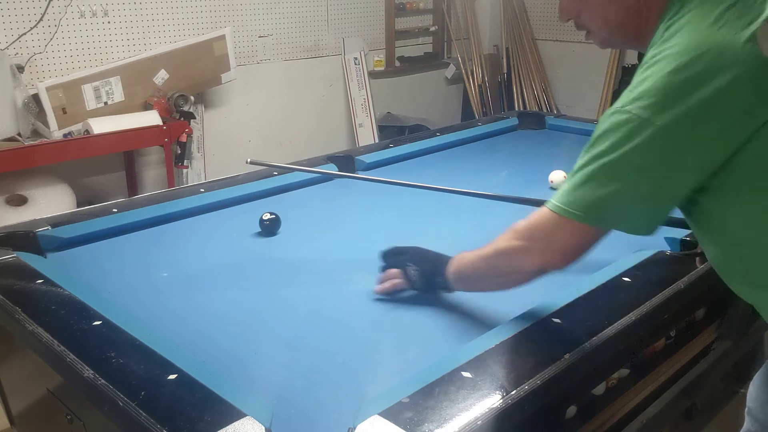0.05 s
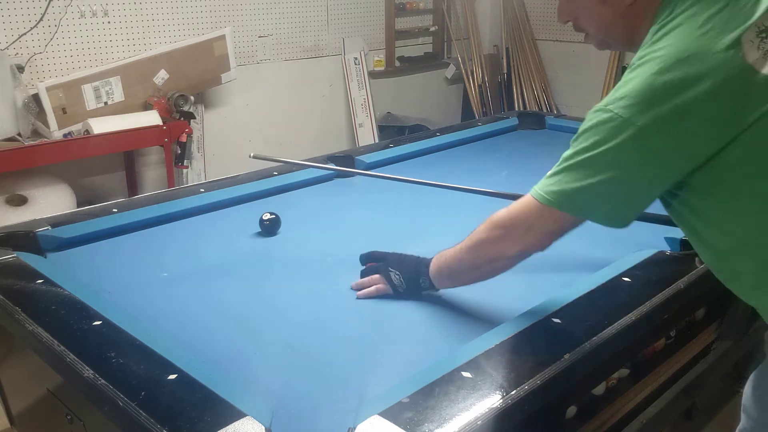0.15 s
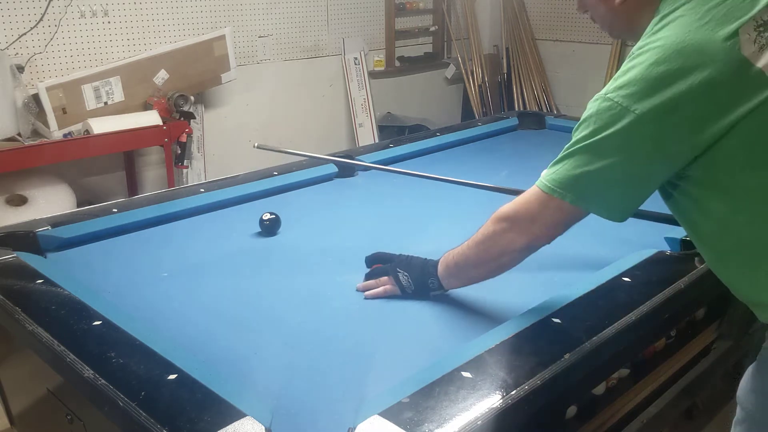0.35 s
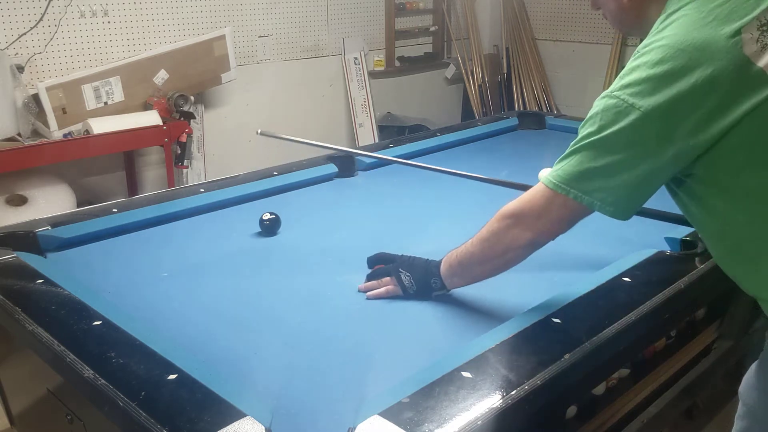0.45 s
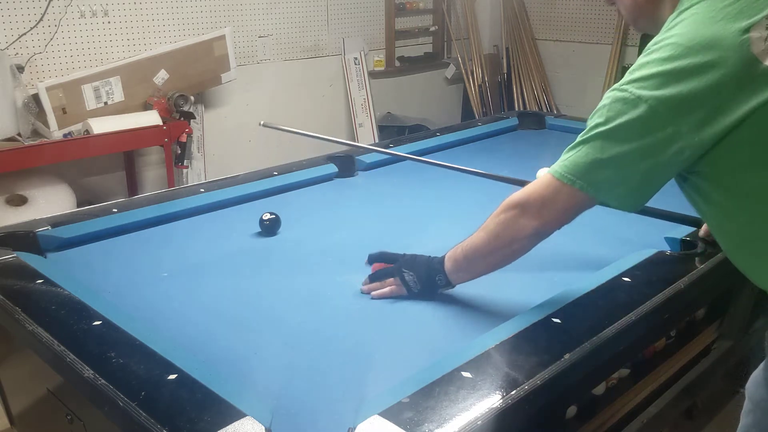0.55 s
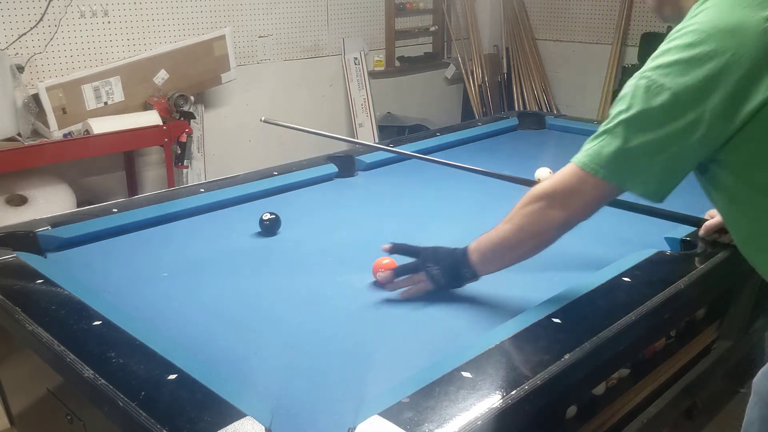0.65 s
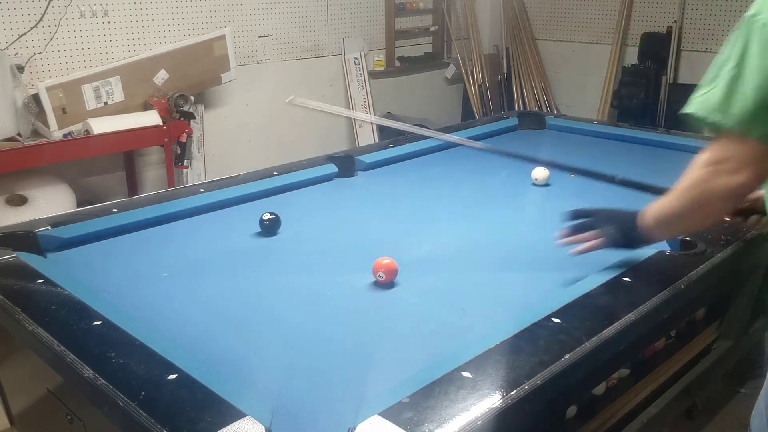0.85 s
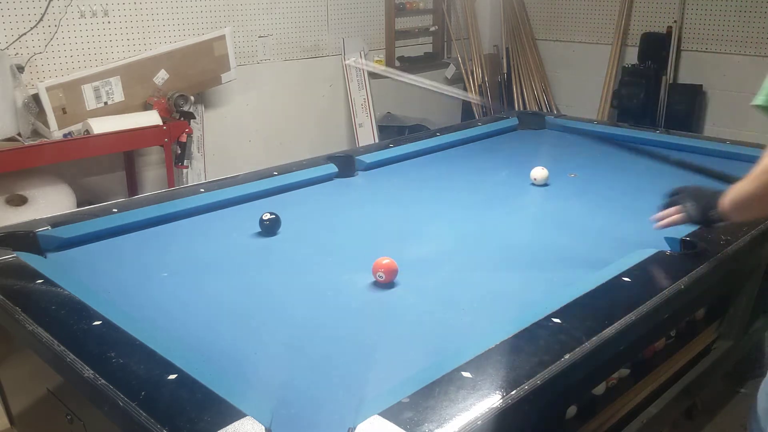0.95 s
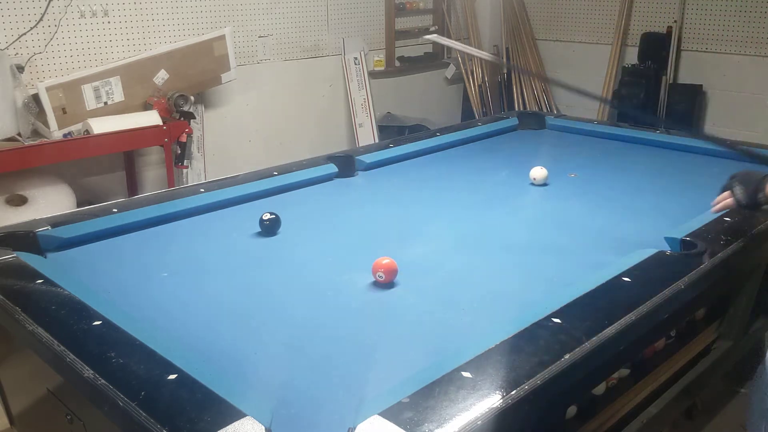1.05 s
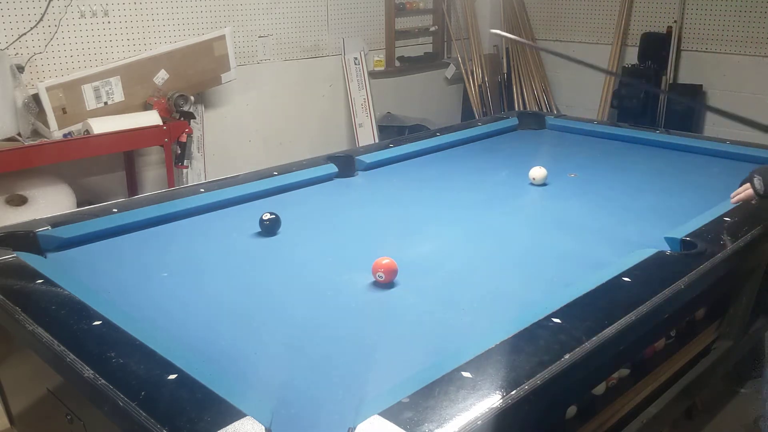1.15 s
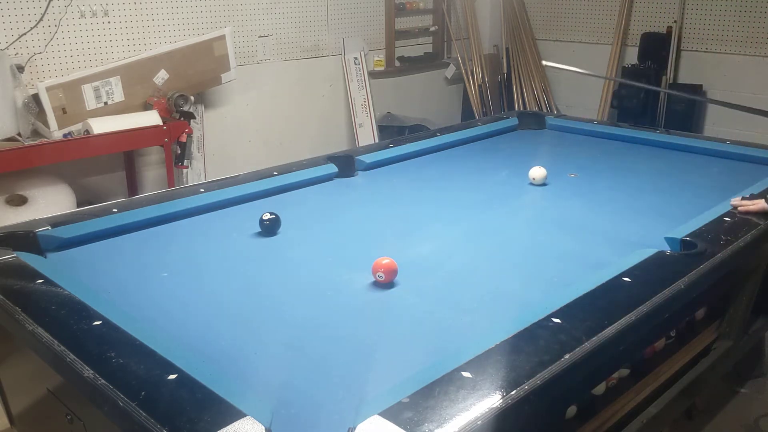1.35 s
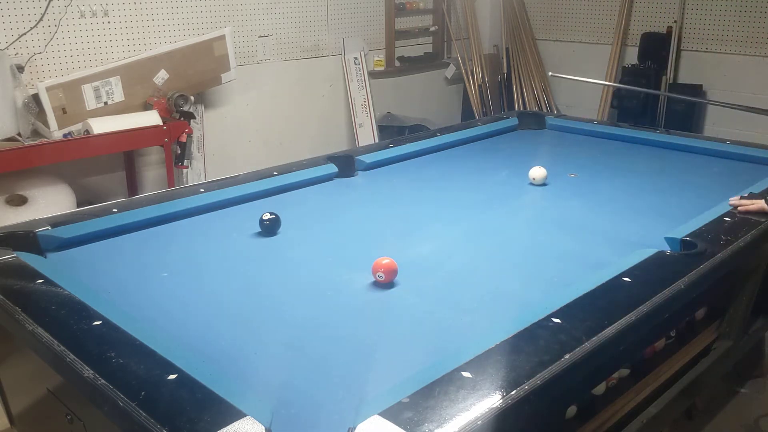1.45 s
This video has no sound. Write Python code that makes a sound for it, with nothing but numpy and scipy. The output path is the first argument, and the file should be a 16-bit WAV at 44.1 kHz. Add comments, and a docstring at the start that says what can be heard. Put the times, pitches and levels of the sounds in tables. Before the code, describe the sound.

A ball lands on a pool table with one hard knock and a low, fading boom. A few faint bumps on the rail follow, then a soft rustle. Microphones beside the table pick up a small workshop's faint rumble and hiss.

```python
"""A small workshop, a pair of microphones by the pool table. A ball is set down hard on the
cloth-covered slate: slate and frame knock, the heavy bed booms in two close low modes, and the room
answers. A few faint bumps follow as the player steps back along the rail. Faint high hiss swells and
fades on the right, and a soft rustle comes near the end. Under it lie a low room rumble,
microphone hiss and, mostly on the left, a faint electrical buzz."""
import sys
import numpy as np
from scipy import signal
from scipy.fft import rfft, irfft, next_fast_len
from scipy.io import wavfile

SR = 44100
rng = np.random.default_rng(int(sys.argv[2]) if len(sys.argv) > 2 else 0)


def wav_out(sig):
    """Save sig, one row per channel (or a flat mono array), as 16-bit PCM at SR to the path in sys.argv[1]."""
    wavfile.write(sys.argv[1], SR, np.round(np.clip(np.atleast_2d(sig).T, -1, 1) * 32767).astype(np.int16))


N = 66150

# The room's rumble. Each row: frequency in Hz, relative level per Hz in dB.
RUMBLE_SPECTRUM = [(15, -12), (30, -5), (45, -8.5), (60, 0), (80, -12), (110, -12.5), (160, -20.5),
                   (220, -20), (300, -28.5), (650, -26), (1000, -36.5), (3000, -62)]
# The rumble across the pair. Each row: frequency in Hz, left-right likeness (1 is identical).
RUMBLE_LIKENESS = [(80, 1), (200, 0.39), (600, 0.17), (1500, 0.23)]
# Each microphone's own hiss. Each row: frequency in Hz, relative level per Hz in dB.
LEFT_MIC_HISS = [(100, -4.5), (1100, -8), (1550, 6.5), (1900, 3.5), (2300, 5), (3000, -9), (4000, -8.5),
                 (5000, -13), (5500, -0.5), (6100, -10), (6700, -8), (7400, -7.5), (7900, -13.5),
                 (9300, -5.5), (10500, -22.5), (15500, -30)]
RIGHT_MIC_HISS = [(100, 5.5), (1000, -1.5), (1600, 3.5), (2200, -1.5), (4000, -5.5), (5600, -7),
                  (6500, -11.5), (9500, -8.5), (10500, -14.5), (11700, -7.5), (12700, -14), (15500, -16)]
# Electrical buzz. Each row: pulses per second, first pulse in seconds, centre in Hz, width in Hz,
# level on the left in dB, pulse sharpness.
BUZZ_BANDS = [(29.4, 0.0025, 2310, 220, -69, 6.5), (84.6, 0.0022, 7150, 510, -71, 1.4)]
# Three swells of high hiss, then three of soft rustle. Each row: middle in seconds, length in seconds,
# centre in Hz, width in octaves, level in dB, left over right in dB.
SWELL_BANDS = [(0.086, 0.043, 13300, .3, -70, -22), (0.422, 0.15, 12500, 0.88, -76.5, -24),
               (0.652, .11, 12900, .3, -77.5, -19.5), (1.148, 0.045, 5600, .2, -75, -17),
               (1.331, 0.031, 1470, 0.39, -62, -9), (1.49, 0.11, 670, 2, -66, -12.5)]
# Light bumps on the rail. Each row: start in seconds, level in dB, brightness in dB per octave,
# left over right in dB, edge click relative to the bump in dB.
RAIL_BUMPS = [(0.904, -55, -1.5, -3.5, -20.5), (.929, -48, -0.5, -4.5, -28),
              (0.9737, -42.5, -0.5, -5.5, -13.5)]
# The rail's dull ring. Each row: frequency in Hz, relative level per Hz in dB.
RAIL_SPECTRUM = [(50, -30.5), (170, 12), (260, 10.5), (380, -3), (700, 6.5), (1100, -8.5), (1600, -7.5),
                 (2300, -17.5), (3200, -21.5), (4500, -35), (15000, -40)]
# Its decay. Each row: frequency in Hz, seconds to fall 60 dB.
RAIL_T60 = [(150, 0.3), (600, 0.16), (3000, 0.4)]
# The bed's two coupled modes. Each row: frequency in Hz, level in dB, seconds to fall 60 dB.
BED_MODES = [(69, -30, 0.7), (61.54, -29.5, 0.83)]
# Modes of slate and frame. Each row: frequency in Hz, relative level in dB, seconds to fall 60 dB.
TABLE_MODES = [(150.3, -16, 0.59), (223.8, -2.5, 0.22), (249, -7.5, 0.16), (330.9, -3.5, 0.34),
               (431.6, -3.5, 0.29), (459, -6, .24), (496.7, -1, 0.34), (594.7, -1, .28), (664.5, -3, 0.19),
               (747, 1.5, 0.16), (832, 5, 0.21), (896, 5.5, 0.19), (1118, -2.5, 0.28), (1190, -5, 0.22),
               (1301, -10.5, 0.28), (1581.7, -10.5, 0.33), (2356, -19.5, 0.29)]
# Clatter, the dense ring of table and room. Each row: frequency in Hz, relative level per Hz in dB.
CLATTER_SPECTRUM = [(40, -19.5), (130, -17), (230, -11.5), (380, -11), (520, 2), (830, 0.5), (1000, -6),
                    (1450, -8), (2000, -18.5), (2400, -21.5), (3300, -38.5), (4200, -50), (5600, -60.5),
                    (8000, -66), (16000, -77)]
# Its decay. Each row: frequency in Hz, seconds to fall 60 dB.
CLATTER_DECAY = [(100, 0.83), (250, 0.36), (700, 0.27), (1500, 0.31), (3000, .29), (6000, 0.37)]
# The table's sound across the pair. Each row: frequency in Hz, left-right likeness.
TABLE_LIKENESS = [(60, 1), (130, 0.96), (290, 0.2), (1100, 0.27), (2000, 0.23), (5000, 0.49)]
# The knock sits to the right. Each row: frequency in Hz, left over right in dB.
KNOCK_PAN = [(60, 2), (150, -2), (250, -6.5), (500, -8.5), (900, -8.5), (1400, -4), (2400, -11.5),
             (4400, -20.5)]

KNOCK_S = 0.2305  # the ball lands


def amp(db):
    """Decibels to gain."""
    return 10 ** (np.asarray(db) / 20)


def unit(x):
    """Scale to rms 1."""
    return x / np.sqrt(np.mean(x ** 2) + 1e-20)


def along(points, hz):
    """Read (Hz, value) points on a log frequency axis."""
    freqs, values = np.transpose(points)
    return np.interp(np.log(hz + 1), np.log(freqs + 1), values)


def since(start):
    """Seconds since the start, zero before."""
    return np.maximum(np.arange(N) / SR - start, 0)


def pan(db):
    """Gains of the two microphones, the left louder by db."""
    return amp(np.array([[.5], [-.5]]) * db)


def filtered(x, response):
    """Apply a gain per frequency."""
    size = next_fast_len(N + SR // 2)
    return irfft(rfft(x, size) * response(np.fft.rfftfreq(size, 1 / SR)), size)[..., :N]


def noise(gain):
    """Mono noise of rms 1 with a gain per frequency."""
    return unit(filtered(rng.standard_normal(N), gain))


def band(centre_hz, octaves):
    """Mono noise of rms 1 in a bell-shaped band."""
    return noise(lambda hz: np.exp(-.5 * (np.log2((hz + 1) / centre_hz) / octaves) ** 2))


def phase_gap(likeness, hz):
    """Angle in radians between left and right that gives this likeness."""
    return np.arccos(np.clip(along(likeness, hz), -1, 1))


def stereo_noise(spectrum, likeness):
    """Stereo noise of rms 1 with a spectrum and a left-right likeness."""
    def mid_side_gains(hz):
        turn = phase_gap(likeness, hz) / 2
        return amp(along(spectrum, hz)) * [np.cos(turn), np.sin(turn)]
    mid, side = filtered(rng.standard_normal((2, N)), mid_side_gains)
    return unit(np.array([mid + side, mid - side]))


def dying(x, start, t60, attack_s):
    """Bring x in at the start and let each frequency die at its own speed."""
    hz, t, spectra = signal.stft(x, SR, nperseg=512)
    fade = amp(-60 * np.maximum(t - start, 0) / along(t60, hz)[:, None])
    attack = 1 - np.exp(-since(start) / attack_s)
    return signal.istft(spectra * fade, SR, nperseg=512)[1][:, :N] * attack


def swell(middle, length, centre_hz, octaves, db, pan_db):
    """A band of noise that rises and fades."""
    envelope = np.exp(-(2 * (np.arange(N) / SR - middle) / length) ** 4)
    return amp(db) * pan(pan_db) * envelope * band(centre_hz, octaves)


def room_rumble():
    """Low room tone, its deepest part alike at both microphones."""
    return amp(-51.5) * pan(-3) * stereo_noise(RUMBLE_SPECTRUM, RUMBLE_LIKENESS)


def microphone_hiss():
    """Two unlike microphones, each with a hiss of its own."""
    left = amp(-63.5) * noise(lambda hz: amp(along(LEFT_MIC_HISS, hz)))
    right = amp(-64.5) * noise(lambda hz: amp(along(RIGHT_MIC_HISS, hz)))
    return np.array([left, right])


def electrical_buzz(right_db=-24.5):
    """Two narrow bands of pulsing noise, mostly in the left channel."""
    buzz = np.zeros(N)
    for rate, first, centre, width, db, sharpness in BUZZ_BANDS:
        pulses = np.exp(sharpness * np.cos(2 * np.pi * rate * (np.arange(N) / SR - first)))
        hiss = noise(lambda hz: np.exp(-.5 * ((hz - centre) / width) ** 2))
        buzz += amp(db) * unit(pulses * hiss)
    return buzz * amp([[0], [right_db]])


def high_hiss_swells():
    """Faint high hiss swells and fades on the right."""
    return sum(swell(*row) for row in SWELL_BANDS[:3])


def soft_rustle():
    """A soft, lower rustle on the right near the end."""
    return sum(swell(*row) for row in SWELL_BANDS[3:])


def rail_bumps(tap_hz=453, tap_t60=0.0099, click_t60=0.011):
    """Right of centre, each contact gives a short tap with a hard edge, and the wood rings dully."""
    out = np.zeros((2, N))
    for start, db, tilt_db, pan_db, click_db in RAIL_BUMPS:
        t = since(start)
        tilt = lambda hz: amp(tilt_db * np.log2(np.clip(hz, 100, 2000) / 500))
        wood = unit(filtered(stereo_noise(RAIL_SPECTRUM, TABLE_LIKENESS), tilt))
        ring = dying(wood, start, RAIL_T60, attack_s=0.00052)
        tap = amp(8.5 - 60 * t / tap_t60) * np.sin(2 * np.pi * tap_hz * t)
        click = amp(click_db - 60 * t / click_t60) * (t > 0) * band(centre_hz=3030, octaves=0.25)
        out += amp(db) * pan(pan_db) * (tap + click + ring)
    return out


def bed_boom():
    """The bed's two close modes start in opposition, so the boom swells, dips and returns lower."""
    t = since(KNOCK_S)
    upper, lower = [amp(db - 60 * t / t60) * np.sin(2 * np.pi * hz * t) for hz, db, t60 in BED_MODES]
    return pan(-3) * (upper - lower)


def table_ring(attack_s=0.0014):
    """Slate and frame ring; each mode reaches the two microphones at a different level and phase."""
    t = since(KNOCK_S)
    ring = np.zeros((2, N))
    for hz, db, t60 in TABLE_MODES:
        gap = phase_gap(TABLE_LIKENESS, hz) * rng.choice([-1, 1])
        phase = rng.uniform(0, 2 * np.pi) + gap * np.array([[.5], [-.5]])
        ring += pan(along(KNOCK_PAN, hz)) * amp(db - 60 * t / t60) * np.sin(2 * np.pi * hz * t + phase)
    return ring * (1 - np.exp(-t / attack_s))


def clatter():
    """Table and room ring so densely that it is heard as a dying burst of noise."""
    wash = stereo_noise(CLATTER_SPECTRUM, TABLE_LIKENESS)
    placed = unit(filtered(wash, lambda hz: pan(along(KNOCK_PAN, hz))))
    return dying(placed, KNOCK_S, CLATTER_DECAY, attack_s=0.00075)


def ball_knock(wall_delay_s=0.0065, before_wall_db=-4):
    """The ball strikes the slate; the knock fills out as the nearest surfaces answer."""
    fill = amp(before_wall_db * np.clip(2 - 2 * since(KNOCK_S) / wall_delay_s, 0, 1))
    return fill * (amp(-21.5) * table_ring() + amp(-13.5) * clatter())


def scene():
    """The table over the faint background, in stereo."""
    table = ball_knock() + bed_boom() + rail_bumps()
    swells = high_hiss_swells() + soft_rustle()
    return table + swells + room_rumble() + microphone_hiss() + electrical_buzz()


def record(dry, top_hz=15800):
    """The recorder keeps nothing above its band limit."""
    return filtered(dry, lambda hz: hz < top_hz)


dry = scene()
out = record(dry)
wav_out(out)
```